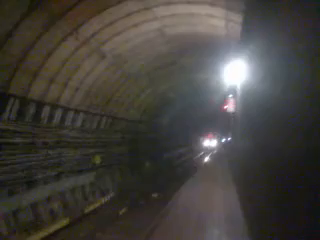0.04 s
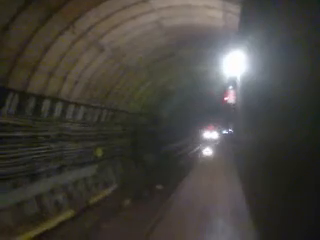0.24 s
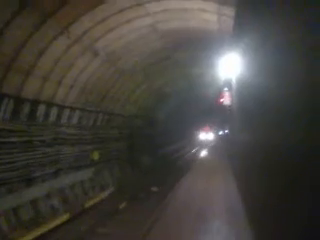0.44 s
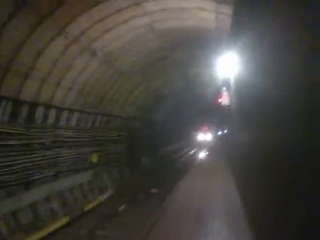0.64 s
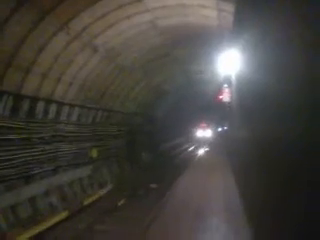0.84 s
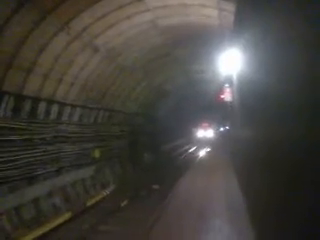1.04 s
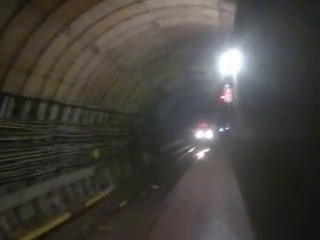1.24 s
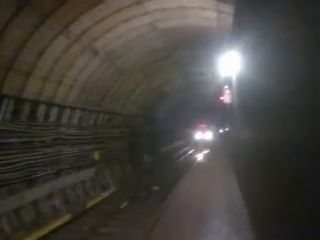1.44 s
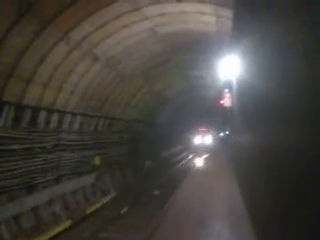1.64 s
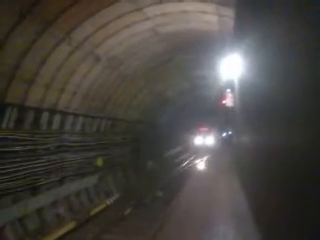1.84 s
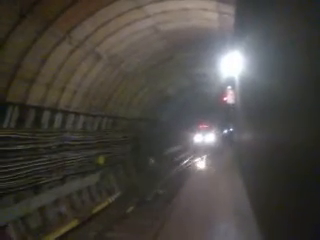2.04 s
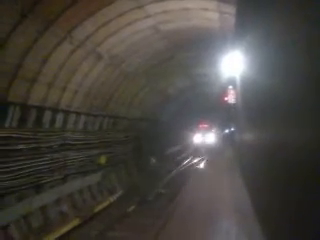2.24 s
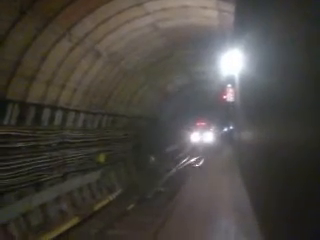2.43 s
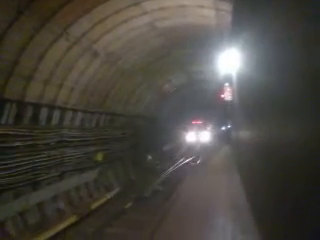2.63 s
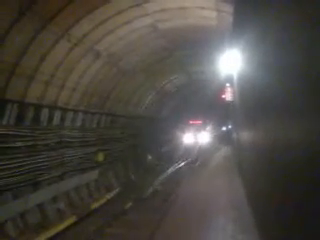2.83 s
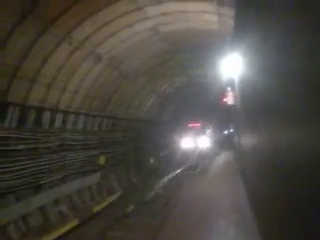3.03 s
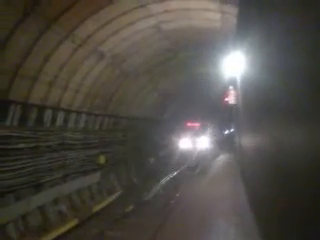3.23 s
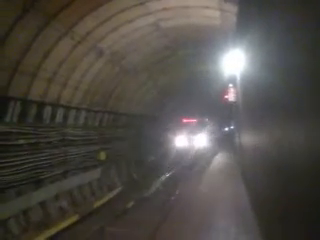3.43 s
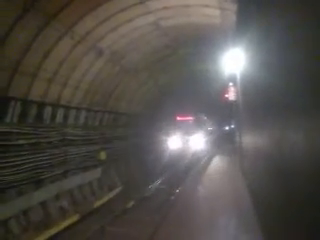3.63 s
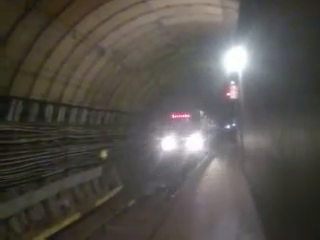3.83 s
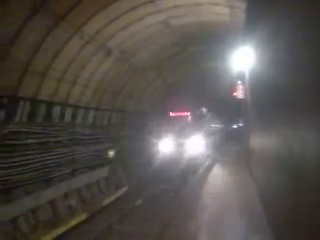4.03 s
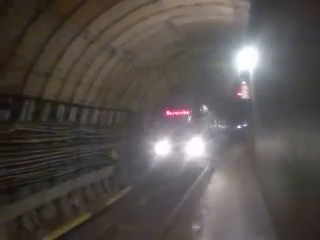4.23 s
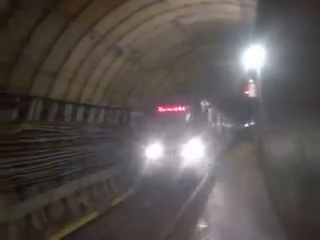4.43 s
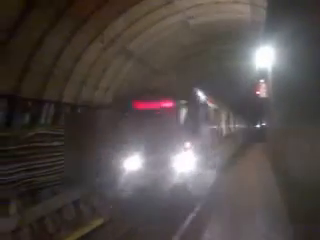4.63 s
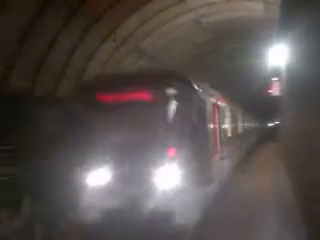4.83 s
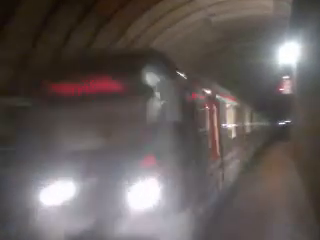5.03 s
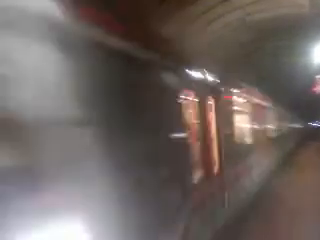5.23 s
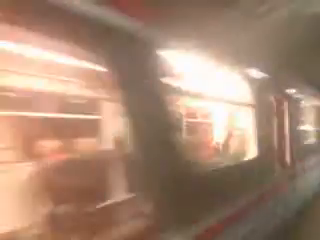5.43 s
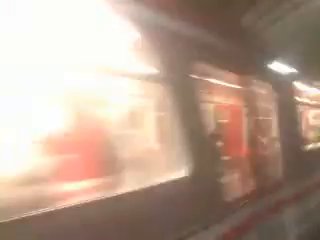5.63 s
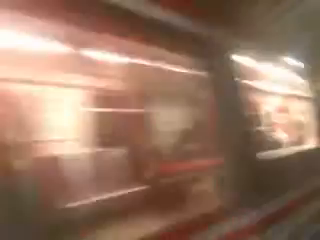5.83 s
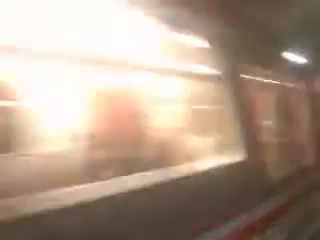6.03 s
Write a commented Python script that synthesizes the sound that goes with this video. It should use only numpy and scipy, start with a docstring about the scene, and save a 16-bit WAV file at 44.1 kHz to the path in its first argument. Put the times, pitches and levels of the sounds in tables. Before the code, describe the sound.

Heard from the edge of an underground platform, steel wheels roar out of an echoing tunnel while low gusts of air thump against a small microphone. A soft motor whine drops in pitch and fades as the train nears. Wheels strike a rail joint, then keep clattering and booming, with short squeaks against the rail. The train goes by loud and close, with a thin, high squeal from its brakes.

```python
"""A metro train brakes out of a tunnel into an underground station, close past the platform edge.
Rails roar and wheels ring ever louder, the motors whine down, and the wheels bang over a rail joint
and set the tunnel booming. A thin friction squeal swells as the brakes go by; flanges rub the rail
and a collector shoe scrapes. Air pushed ahead of the train buffets a small microphone."""
import sys
import numpy as np
from scipy import signal
from scipy.fft import rfft, irfft
from scipy.io import wavfile
from scipy.ndimage import uniform_filter1d

SR = 44100
rng = np.random.default_rng(int(sys.argv[2]) if len(sys.argv) > 2 else 0)


def wav_record(signal):
    """Record a signal, one row per channel, as 16-bit PCM in the file named by sys.argv[1]."""
    frames = np.transpose(np.atleast_2d(signal))
    bounded = np.clip(frames, -1, 1)
    # unit amplitude maps onto the largest positive 16-bit level
    quanta = np.round(bounded * 32767).astype(np.int16)
    wavfile.write(sys.argv[1], SR, quanta)


N = 269451
TIME_S = np.arange(N) / SR
FFT_SIZE = 2 * (N // 2 + 1)
FREQS_HZ = np.maximum(np.fft.rfftfreq(FFT_SIZE, 1 / SR), 1)

START_M_PER_S, BRAKING_M_PER_S2 = 17, 0.82
JOINT_S, ARRIVAL_S = 2.876, 5.3   # train front at the rail joint, at the microphone

# rolling spectrum from down the tunnel (frequency [Hz], relative level [dB])
FAR_SPECTRUM = [(200, -4.5), (380, -12.5), (480, -8.5), (720, -8.5), (850, -12), (1050, -13), (1350, -16),
                (1750, -20.5), (2150, -17), (2500, -19), (3100, -26.5), (3500, -29.5), (4200, -36.5),
                (5200, -35), (7200, -49.5)]
# rolling spectrum close by (frequency [Hz], relative level [dB])
NEAR_SPECTRUM = [(200, 0.5), (330, -6.5), (450, -10.5), (590, -11.5), (730, -9.5), (980, -15.5),
                 (1600, -19.5), (2100, -14.5), (2450, -17.5), (3000, -23.5), (3600, -29), (5100, -32.5),
                 (5800, -35.5), (7200, -40)]
# rough stretches of rail (start [s], hold [s], roar lift [dB], treble lift [dB])
ROUGH_STRETCHES = [(0.256, 0.099, 4.5, 0.5), (.55, 0.32, 0, -1.5), (1.02, 0.079, 1, 1),
                   (1.298, 0.051, 4.5, 4), (1.398, 0.26, 5.5, 2.5), (1.805, 0.18, 4, 7),
                   (2.21, 0.045, 4.5, 1.5), (2.515, 0.14, 2, 8.5), (2.95, 0.51, 1.5, 4),
                   (3.456, 0.13, 4.5, 7), (4.043, 0.043, 6.5, 5), (4.44, 0.078, 0.5, 6),
                   (4.998, 0.082, 2, 3), (5.903, 0.36, 1, 2)]
# bogies jolting over the joint (start [s], hold [s], boom level [dB], shake rate [Hz])
BOGIE_JOLTS = [(2.867, 0.32, -10.5, 200), (3.306, 0.2, -13, 168), (3.866, 0.041, -11.5, 193),
               (4.029, 0.19, -13.5, 213), (4.364, 0.34, -12.5, 166), (4.814, 0.16, -14.5, 163),
               (5.352, 0.4, -12, 179), (5.85, 0.2, -12, 165)]
# tunnel air modes (frequency [Hz], width [Hz], relative level [dB])
TUNNEL_RESONANCES = [(141.8, 32, -1.5), (178.8, 33, -2), (219.3, 20, -0.5)]
# squealing wheel modes (frequency [Hz], width [Hz], relative level [dB])
WHEEL_RESONANCES = [(2452, 72, 2.5), (2344, 68, -3), (4880, 420, -12.5)]
# squealing brake disc modes (frequency [Hz], width [Hz], relative level [dB])
DISC_RESONANCES = [(4740, 140, -10), (4960, 220, -10), (7030, 90, -20.5), (7140, 420, -9),
                   (8600, 200, -3.5)]
# brakes going by (centre [s], half length [s], level [dB])
PASSING_BRAKES = [(4.68, 0.66, -34), (5.858, 0.65, -25)]
# air turbulence spectrum (frequency [Hz], relative level [dB])
DRAUGHT_SPECTRUM = [(15, -6.5), (50, 1), (85, -0.5), (140, -8.5), (280, -15.5)]
# gusts in the draught (centre [s], half length [s], level [dB])
DRAUGHT_GUSTS = [(0.317, 0.12, -22), (0.593, 0.18, -20), (1.059, 0.045, -17), (1.46, 0.18, -19.5),
                 (1.876, 0.082, -15.5), (2.198, 0.35, -26), (2.803, .2, -18.5), (3.076, .06, -13),
                 (4.422, 0.058, -12), (4.68, 0.14, -22), (5.22, 0.29, -19.5), (5.957, .1, -18)]
# single eddies (centre [s], peak [dB], frequency [Hz])
EDDIES = [(0.322, -9.5, 60), (0.487, -9.5, 52), (.650, -11.5, 420), (1.882, -4.5, 44.6), (2.093, -14, 130),
          (2.241, -9, 59.6), (4.421, -3, 54)]
# flanges touching the rail (start [s], rise [s], level [dB], frequency [Hz], width [Hz])
FLANGE_CONTACTS = [(.45, 0.09, -49, 4960, 70), (1.77, 0.16, -28, 3020, 200), (2.13, .1, -34, 2480, 80),
                   (3.45, .06, -33, 5060, 450), (3.725, 0.013, -22, 2850, 760), (4.17, .09, -29, 2440, 110),
                   (5.0, 0.072, -22, 2220, 800)]
# sharp click (time [s], peak [dB], frequency [Hz])
CLICKS = [(.472, -14.5, 2350)]
# wheels striking the joint (time [s], level [dB], upper corner [Hz])
JOINT_BLOWS = [(2.873, -10, 1300), (2.929, -13.5, 750), (3.04, -14, 650), (3.316, -15.5, 900),
               (4.924, -10.5, 1050), (5.092, -10.5, 1700), (5.324, -13, 840)]


def from_db(db):
    """Decibels to gain."""
    return 10 ** (np.asarray(db) / 20)


def colour(points):
    """Gain per frequency, interpolated from (frequency [Hz], level [dB])."""
    hz, db = np.transpose(points)
    return from_db(np.interp(np.log(FREQS_HZ), np.log(hz), db))


def band(low_hz, high_hz, order=5):
    """Band-pass gain per frequency."""
    return ((1 + (low_hz / FREQS_HZ) ** (2 * order)) * (1 + (FREQS_HZ / high_hz) ** (2 * order))) ** -0.5


def noise(gains):
    """Unit-power noise with the given spectrum."""
    x = irfft(gains * rfft(rng.standard_normal(FFT_SIZE)))[:N]
    return x / np.sqrt(np.mean(x ** 2) + 1e-20)


def flutter(rate_hz, depth_db):
    """Gain wandering at random about one."""
    return from_db(depth_db * noise(band(rate_hz / 10, rate_hz, order=2)))


def resonant(modes):
    """Modes driven by random forces; unit power."""
    return noise(sum(from_db(db) / np.sqrt(width_hz) / (1 + 2 * ((FREQS_HZ - hz) / width_hz) ** 2)
                     for hz, width_hz, db in modes))


def sustained(x, span_s):
    """Level out slow swells, as under a steady drive."""
    power = uniform_filter1d(x ** 2, int(span_s * SR))
    return x / np.sqrt(np.maximum(power, 1e-9))


def swells(rows):
    """Sum of Gaussian envelopes."""
    return sum(from_db(db) * np.exp(-2 * ((TIME_S - centre_s) / half_s) ** 2)
               for centre_s, half_s, db in rows)


def decay(start_s, t60_s):
    """Unit gain until start_s, then exponential decay."""
    return from_db(-60 * np.maximum(TIME_S - start_s, 0) / t60_s)


def envelope(start_s, attack_s, t60_s, hold_s=0):
    """Attack, hold, decay."""
    age_s = np.maximum(TIME_S - start_s, 0)
    return (1 - np.exp(-age_s / attack_s)) * decay(start_s + hold_s, t60_s)


def speed_m_per_s():
    """Train speed under even braking."""
    return START_M_PER_S - BRAKING_M_PER_S2 * TIME_S


def approach(far_db, near_db):
    """Gain with a constant dB loss per metre of tunnel still ahead of the train."""
    step_m = speed_m_per_s() * (TIME_S < ARRIVAL_S) / SR
    distance_m = np.cumsum(step_m[::-1])[::-1]
    return from_db(near_db + (far_db - near_db) * distance_m / distance_m[0])


def joint_step(loss_db=3.5):
    """Gain steps up to one as the first wheels cross onto the near rail."""
    return from_db(-loss_db * (TIME_S < JOINT_S))


def jolts():
    """Bogie shaking after each jolt: (gain over time, shake rate [Hz])."""
    return [(from_db(db) * envelope(start_s, attack_s=0.0064, t60_s=0.6, hold_s=hold_s), hz)
            for start_s, hold_s, db, hz in BOGIE_JOLTS]


def rolling_noise(low_hz, high_hz):
    """One band of steel noise; the tunnel colours it until the train is close."""
    closeness = np.clip((TIME_S - 2.3) / 0.81, 0, 1)
    far = noise(colour(FAR_SPECTRUM) * band(low_hz, high_hz))
    near = noise(colour(NEAR_SPECTRUM) * band(low_hz, high_hz))
    return np.sqrt(1 - closeness) * far + np.sqrt(closeness) * near


def rolling(clatter_vs_boom_db=-6):
    """Rough steel on steel: rails radiate the lows, wheels the middle, the contact patch the hiss."""
    roar_lift_db, treble_lift_db = sum(
        np.outer(lifts_db, envelope(start_s, attack_s=0.015, t60_s=0.55, hold_s=hold_s))
        for start_s, hold_s, *lifts_db in ROUGH_STRETCHES)
    clatter_gain = from_db(clatter_vs_boom_db) * sum(gain for gain, _ in jolts())
    roar_gain = np.hypot(approach(far_db=-32.5, near_db=-18) * from_db(roar_lift_db), clatter_gain)
    ring_gain = approach(far_db=-38, near_db=-23) * from_db(treble_lift_db)
    hiss_gain = approach(far_db=-48, near_db=-32) * from_db(treble_lift_db)
    roar = roar_gain * rolling_noise(261, 1606) * flutter(rate_hz=57, depth_db=1)
    ring = ring_gain * rolling_noise(1200, 3020) * flutter(rate_hz=20, depth_db=0.38)
    hiss = hiss_gain * rolling_noise(3250, 7500)
    rail_flaws = flutter(rate_hz=11, depth_db=0.74)
    return (roar + ring + hiss) * joint_step() * rail_flaws


def tunnel_boom(plain_rail_hz=144, reach_hz=65):
    """Bogies shake the tunnel air, favouring the modes near their shake rate."""
    rumble_gain = approach(far_db=-36.5, near_db=-19.5) * joint_step()
    drives = [(rumble_gain, plain_rail_hz)] + jolts()
    power = sum(gain ** 2 for gain, _ in drives)
    shake_hz = sum(gain ** 2 * hz for gain, hz in drives) / power
    air = np.zeros(N)
    for hz, width_hz, db in TUNNEL_RESONANCES:
        coupling = 1 / (1 + ((hz - shake_hz) / reach_hz) ** 2)
        air += from_db(db) * coupling * resonant([(hz, width_hz, 0)])
    return np.sqrt(power) * sustained(air, span_s=0.12)


def motor_whine(start_hz=601, fade_db_per_s=10.5):
    """Pitch sinks with speed; echoes blur it to a narrow band. Fades past the joint."""
    phase = 2 * np.pi * np.cumsum(start_hz * speed_m_per_s() / START_M_PER_S) / SR
    sidebands = colour([(1, -2), (9, -2.5), (25, -21), (55, -11), (130, -43.5), (400, -100)])
    whine = noise(sidebands) * np.cos(phase) + noise(sidebands) * np.sin(phase)
    fade = from_db(-fade_db_per_s * np.maximum(TIME_S - JOINT_S, 0))
    return approach(far_db=-35, near_db=-30) * fade * sustained(whine, span_s=0.1)


def squeals(whistle_hz=4950, whistle_width_hz=34, whistle_floor_db=-57.5, whistle_vs_brake_db=-11.5):
    """Friction drives high wheel and brake disc modes; a thin whistle sits an octave over the wheels."""
    passing = swells(PASSING_BRAKES)
    wheels = approach(far_db=-47.5, near_db=-31) * resonant(WHEEL_RESONANCES)
    whistle_gain = from_db(whistle_floor_db) + from_db(whistle_vs_brake_db) * passing
    whistle = whistle_gain * resonant([(whistle_hz, whistle_width_hz, 0)])
    brakes = (approach(far_db=-57.5, near_db=-53.5) + passing) * resonant(DISC_RESONANCES)
    return (wheels + whistle) * flutter(rate_hz=7.6, depth_db=2.5) + brakes


def draught():
    """Air pushed ahead of the train: low, gusty turbulence."""
    flow_gain = np.hypot(approach(far_db=-28.5, near_db=-21), swells(DRAUGHT_GUSTS))
    turbulence = noise(colour(DRAUGHT_SPECTRUM) * band(24, 230, order=3))
    return flow_gain * sustained(turbulence, span_s=0.11)


def buffets():
    """Each eddy pushes, then pulls the microphone diaphragm."""
    out = np.zeros(N)
    for centre_s, db, hz in EDDIES:
        phase = 2 * np.pi * hz * (TIME_S - centre_s)
        out -= from_db(db) * phase * np.exp((1 - phase ** 2) / 2)
    return out


def flange_rubs(t60_s=0.85):
    """Flanges touch the rail: short, rough shrieks."""
    out = np.zeros(N)
    for start_s, rise_s, db, hz, width_hz in FLANGE_CONTACTS:
        rise = np.clip((TIME_S - start_s) / rise_s, 0, 1)
        out += from_db(db) * rise * decay(start_s + rise_s, t60_s) * resonant([(hz, width_hz, 0)])
    return out


def click(t60_s=0.0042):
    """A dry click close by, gone in a few cycles."""
    out = np.zeros(N)
    for start_s, db, hz in CLICKS:
        tone = np.cos(2 * np.pi * hz * (TIME_S - start_s))
        out += from_db(db) * (TIME_S >= start_s) * decay(start_s, t60_s) * tone
    return out


def joint_bangs():
    """Wheels strike the joint: bursts of ringing steel, drawn out by the tunnel."""
    out = np.zeros(N)
    for start_s, db, hz in JOINT_BLOWS:
        steel = noise(band(hz / 2, hz, order=1) * band(330, 2100, order=2))
        out += from_db(db) * envelope(start_s, attack_s=0.0041, t60_s=0.39) * steel
    return out * flutter(rate_hz=130, depth_db=2)


def shoe_scrape(start_s=4.458, level_db=-26):
    """A collector shoe skids on the power rail: a short, bright hiss."""
    return from_db(level_db) * envelope(start_s, attack_s=0.008, t60_s=0.55) * noise(band(4900, 6500))


def scene():
    """Train and draught from the platform; mono."""
    train = rolling() + tunnel_boom() + motor_whine() + squeals()
    air = draught() + buffets()
    transients = flange_rubs() + click() + joint_bangs() + shoe_scrape()
    return (train + air + transients)[None]


def overload(x, ceiling, hardness):
    """Soft clipper."""
    return x / (1 + np.abs(x / ceiling) ** hardness) ** (1 / hardness)


def record(dry, gain_db=0.12, treble_limit_hz=7040, stopband_hz=15800):
    """Small voice microphone: overload, treble loss, a second clip, final low-pass."""
    treble_loss = signal.butter(18, treble_limit_hz, fs=SR, output="sos")
    low_pass = signal.cheby2(12, 70, stopband_hz, fs=SR, output="sos")
    overloaded = overload(dry * from_db(gain_db), ceiling=0.79, hardness=8)
    dulled = signal.sosfilt(treble_loss, overloaded)
    clipped = overload(dulled, ceiling=0.73, hardness=40)
    return signal.sosfilt(low_pass, clipped)


dry = scene()
out = record(dry)
wav_record(out)
```